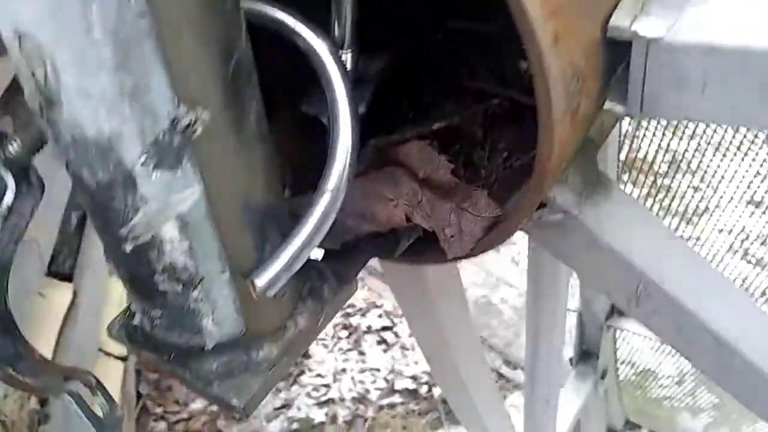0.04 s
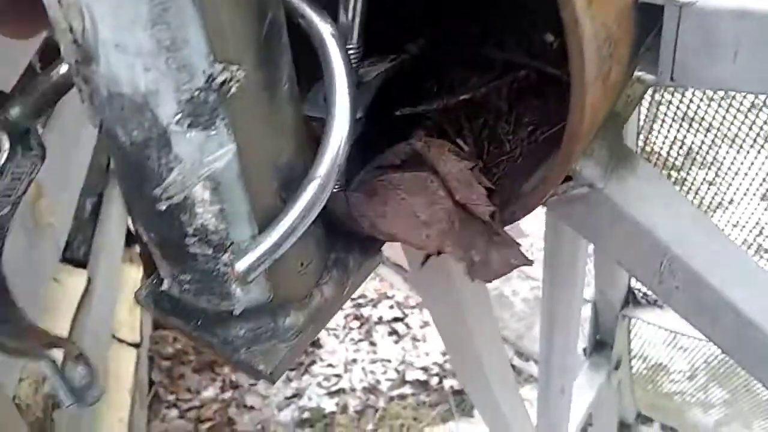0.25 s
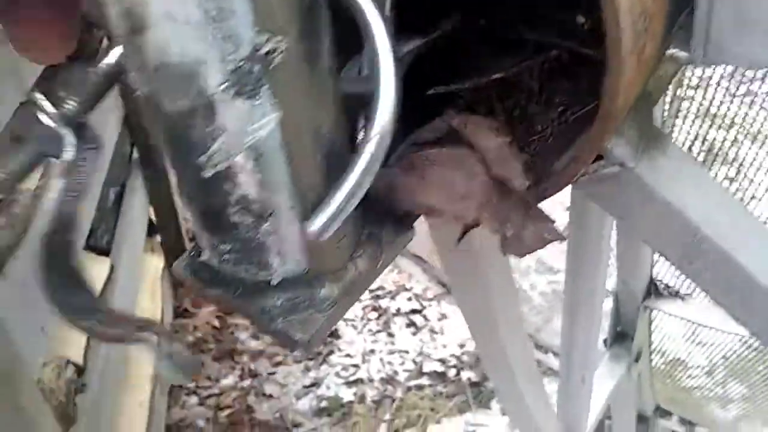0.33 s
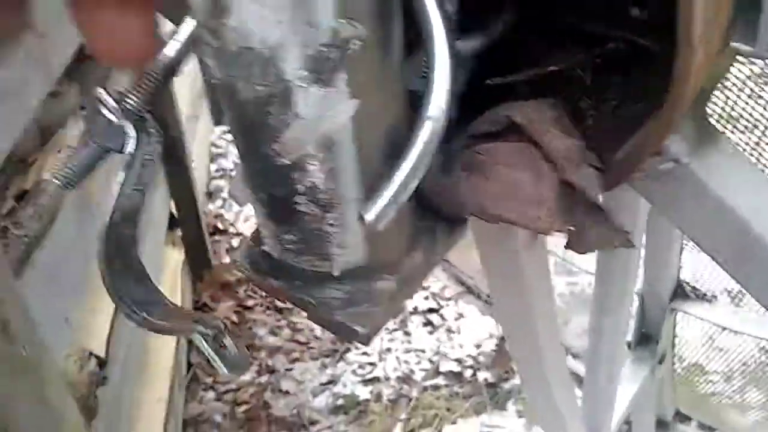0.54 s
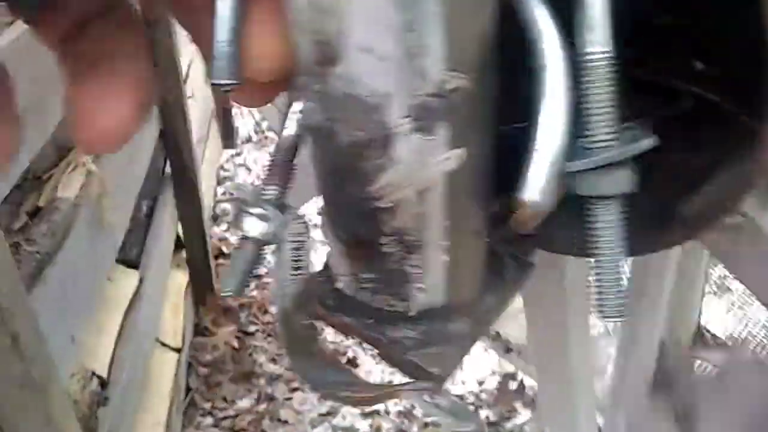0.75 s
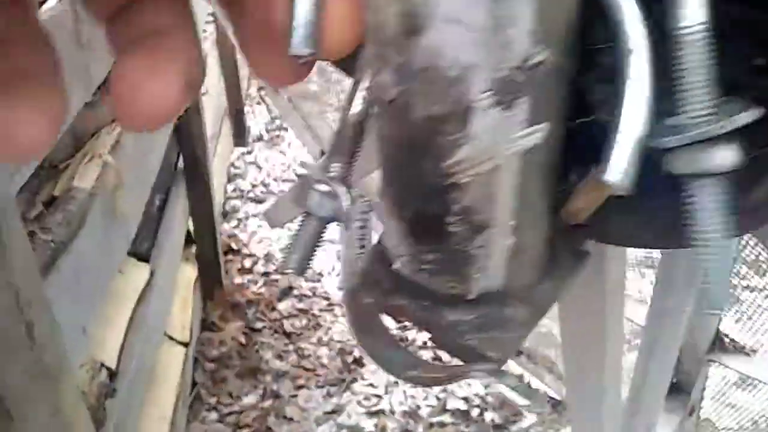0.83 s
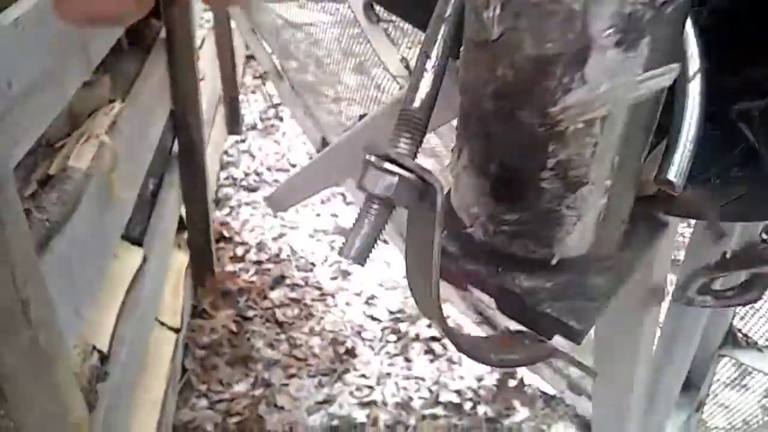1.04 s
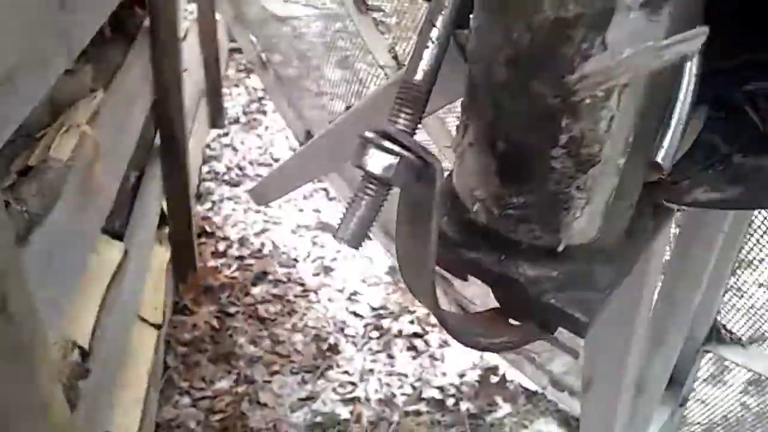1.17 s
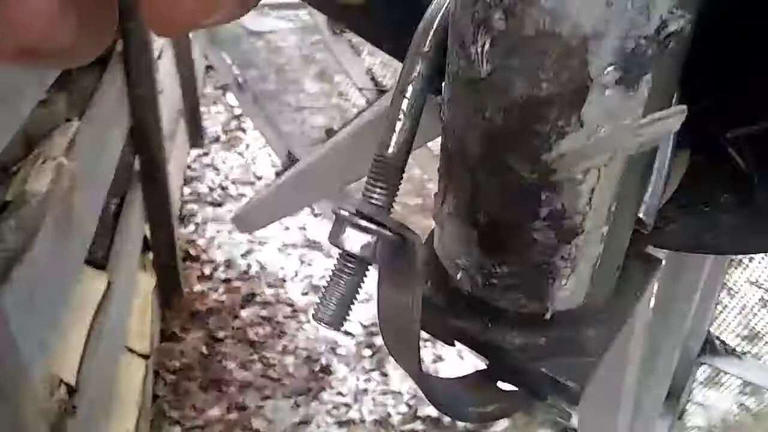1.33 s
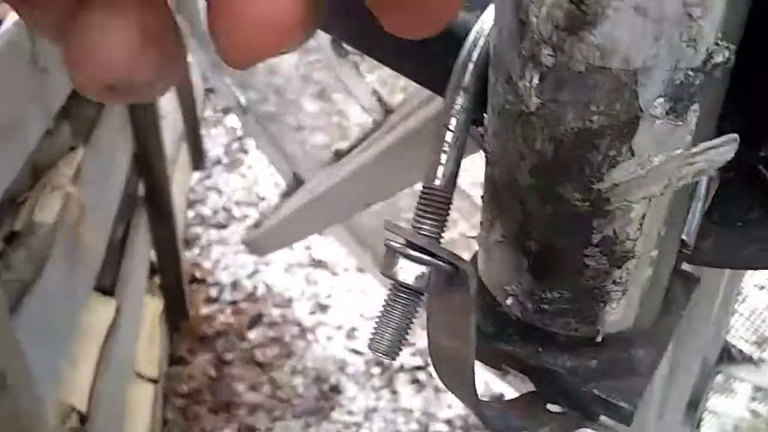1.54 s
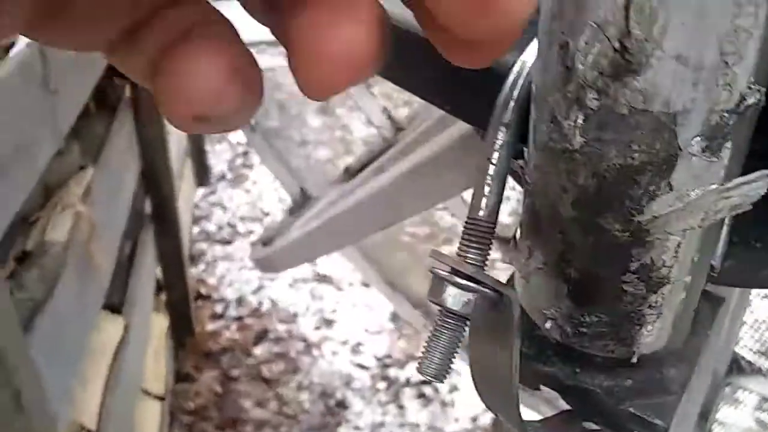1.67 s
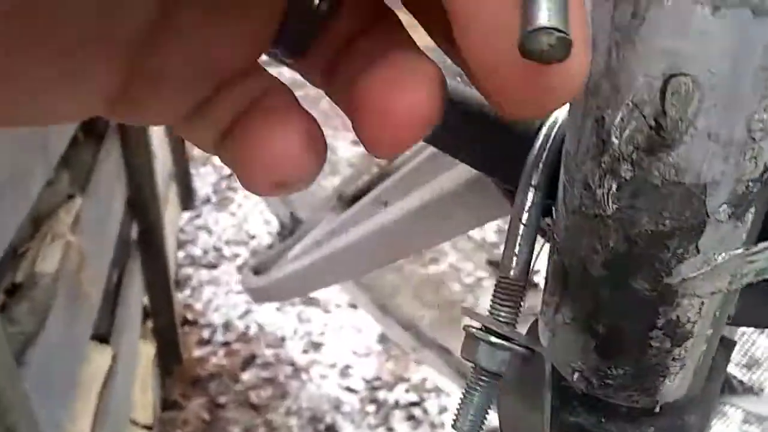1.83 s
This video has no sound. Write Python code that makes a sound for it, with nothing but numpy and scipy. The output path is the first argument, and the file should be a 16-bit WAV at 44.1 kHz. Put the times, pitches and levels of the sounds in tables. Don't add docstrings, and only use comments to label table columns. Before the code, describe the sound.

Loose steel bolts and a strap clink and rattle against a pipe, then settle into sparse ticks

```python
import sys
import numpy as np
from scipy import signal
from scipy.fft import rfft, irfft
from scipy.io import wavfile
from scipy.ndimage import uniform_filter1d

SR = 44100
rng = np.random.default_rng(int(sys.argv[2]) if len(sys.argv) > 2 else 0)


def volts(x):
    e = np.asarray(x, float) / 20
    return 10 ** e


def master(y):
    cut = np.clip(np.atleast_2d(y).T, -1, 1)
    pcm = np.round(cut * 32767)
    wavfile.write(sys.argv[1], SR, pcm.astype(np.int16))


N = 83790

# frequency in Hz, level in dB per Hz.
STEEL_SPECTRUM = [(150, -53), (250, -21.5), (2200, -6.5), (2440, -4), (4100, -2.5), (5310, -4), (9880, -4),
                  (13500, -14), (15500, -36)]
# frequency in Hz, left-right difference in dB.
CONTACT_LEAN = [(150, -21.5), (1200, 2), (2500, -7), (5000, 2), (7200, -9.5), (8600, -6), (10500, -7.5),
                (14000, -19)]
BOLT_MODES = [3900, 4400, 5340, 6500, 7400, 7830, 8820, 10040, 11450, 12400, 13200, 13600]
HANDLING_PAN_DB = -9.5
PORTS_ALIKE = 0.16


def at_hz(points, hz):
    points = np.array(points)
    return np.interp(np.log(hz + 1e-9), np.log(points[:, 0]), points[:, 1])


def sides(db):
    return volts(np.array([db / 2, -db / 2]))


def coloured(x, spectrum, lean):
    hz = np.fft.rfftfreq(N, 1 / SR)
    mean_lean = np.mean(np.array(lean)[:, 1])
    gain = volts(at_hz(spectrum, hz)) * sides(at_hz(lean, hz) - mean_lean)
    return irfft(rfft(x) * gain / np.sqrt(np.mean(gain ** 2)), N)


def pair(size, alike):
    a, b = rng.standard_normal((2, size))
    alike = np.clip(alike, 0, 1)
    return np.array([a, alike * np.roll(a, 9) + np.sqrt(1 - alike ** 2) * b])


def octave_part(x, low, high):
    return signal.sosfilt(signal.butter(2, [low, high], "band", fs=SR, output="sos"), x)


def high_pass(x, order, hz):
    return signal.sosfilt(signal.butter(order, hz, "high", fs=SR, output="sos"), x)


def smooth_noise(size, width):
    return uniform_filter1d(uniform_filter1d(rng.standard_normal(size), size=width), size=width)


def fade(t, t60):
    return volts(-60 * t / t60)


def add(out, s, sound):
    i = max(int(s * SR), 0)
    out[:, i:i + sound.shape[1]] += sound[:, :N - i]


def open_air():
    # frequency in Hz, level in dB per Hz.
    air_spectrum = [(25, -14), (65, -5), (130, -3), (220, -13.5), (900, -20), (3000, -21), (9000, -16.5),
                    (14500, -12.5)]
    air_lean = [(30, -1.5), (300, -4.5), (2000, -1), (12000, -9)]  # Hz, left-right dB
    level_db = -57.5 + 4.5 - 3.3 * np.arange(N) / SR
    return volts(level_db) * coloured(pair(N, 0.52), air_spectrum, air_lean)


def knocks():
    # start in seconds, level in dB, left-right difference in dB, centre in Hz, t60 in seconds.
    knock_rows = [(0, -34.5, 1, 1510, 0.9), (0, -49.5, 4.5, 378, 0.7), (.69, -44.5, 2, 5940, 0.27),
                  (0.61, -36.5, -19, 73.3, 0.13), (.938, -34, -5, 357.5, 0.11), (.939, -24, 0.5, 1416, 0.1),
                  (1.077, -24, 2, 1852, 0.08), (1.084, -37, 2.5, 674, 0.28), (1.139, -36, 2, 1500, 0.18),
                  (1.832, -31, 3, 1760, 0.021), (1.862, -48.5, 5, 1880, 0.028), ]
    out, t = np.zeros((2, N)), np.arange(12000) / SR
    for s, db, pan, hz, t60 in knock_rows:
        band = octave_part(pair(2 * len(t), PORTS_ALIKE), hz / 1.367, hz * 1.255)[:, len(t):]
        shape = fade(t, t60) * np.minimum(t * hz, 1)
        add(out, s, volts(db) * sides(pan)[:, None] * band / band.std() * shape)
    return out


def scrapes():
    # start in seconds, length in seconds, rms level in dB, place of the peak from 0 to 1.
    stroke_rows = [(0, .065, -42, 0), (0.058, 0.15, -28, 0.2), (0.167, 0.055, -31, 0.23),
                   (0.193, 0.036, -24, 0.63), (0.237, 0.088, -30, 0.32), (0.393, 0.076, -26.5, 0.17),
                   (0.434, 0.066, -23, 0.54), (0.516, 0.031, -34.5, 0), (0.547, 0.067, -19.5, 0.43),
                   (0.605, 0.034, -11, 0), (0.619, 0.057, -18.5, 0.47), (0.667, 0.068, -24.5, 0.6),
                   (0.923, 0.076, -19.5, 0.3), (0.969, 0.038, -18.5, 0.4), (0.995, 0.15, -31.5, 0),
                   (1.075, 0.017, -31, 0), (1.325, 0.037, -48.5, 0), (1.517, 0.055, -34.5, 0.1),
                   (1.559, 0.088, -51, 0.28), (1.709, 0.078, -46.5, 0.23)]
    grains_per_s, grain_spread_db, rasp_db = 8800, 2, 0
    mode_q, mode_share = 45, 1.2
    stroke = np.zeros((2, N))
    for s, length, db, peak in stroke_rows:
        pan = HANDLING_PAN_DB if s < .8 else -5
        u, peak = np.linspace(0, 1, int(length * SR)), np.clip(peak, .12, .9)
        swell = np.sin(np.pi / 2 * np.minimum(u / peak, (1 - u) / (1 - peak))) ** 3.2
        add(stroke, s, volts(db) * sides(pan)[:, None] * swell)
    rasp = smooth_noise(N, 70)
    sizes = volts(grain_spread_db * np.minimum(rng.exponential(1, N), 4))
    sizes = sizes * (rng.random(N) < grains_per_s / SR)
    sizes = uniform_filter1d(sizes, size=12) * volts(rasp_db * rasp / rasp.std())
    grit = stroke * pair(N, PORTS_ALIKE) * sizes / np.sqrt(np.mean(sizes ** 2))
    modes = sum(signal.lfilter(*signal.iirpeak(hz, mode_q, fs=SR), grit) for hz in BOLT_MODES)
    return coloured(grit + mode_share * modes, STEEL_SPECTRUM, CONTACT_LEAN)


def pipe(contact):
    # frequency in Hz, level in dB.
    hum_spectrum = [(200, -25), (300, -18), (600, -11.5), (1300, -12.5), (2200, -15), (4500, -19.5),
                    (14000, -38.5)]
    # frequency in Hz, t60 in seconds.
    hum_t60 = [(250, .12), (600, 0.34), (1400, 0.56), (3000, 0.12), (10000, 0.39)]
    t, answer = np.arange(20000) / SR, 0
    for hz in 200 * 2 ** np.arange(0, 6.5, .5):
        band = octave_part(rng.standard_normal((2, len(t))), hz / 1.19, hz * 1.19)
        shape = fade(t, at_hz(hum_t60, hz)) * np.minimum(t / 0.001, 1)
        answer = answer + volts(at_hz(hum_spectrum, hz)) * band * shape
    return volts(-19) * signal.fftconvolve(contact, answer, axes=1)[:, :N]


def rings():
    # start in seconds, frequency in Hz, level in dB, t60 in
    # seconds, held in seconds.
    strong_rings = [(.145, 9000, -39, 0.38, 0.088), (0.336, 6684, -4.5, 0.079, 0.019),
                    (.337, 9500, -22, 0.19, 0.052), (.337, 12190, -14.5, 0.076, .055),
                    (0.352, 7105, -18, 0.18, 0.031), (.689, 8092, -24, 0.42, .23),
                    (.689, 13570, -12.5, 0.071, .06), (.689, 4110, -27, .1, 0.055),
                    (.889, 9300, -38.5, 0.39, 0.038), (.92, 9330, -23, 0.32, 0.031),
                    (.938, 7240, -7.5, 0.21, 0.031), (0.939, 4126, -21, 0.33, .11),
                    (0.977, 3290, -23.5, 0.39, 0.054),
        (.97, 9418, -18.5, 0.36, 0.023),
        (0.995, 9450, -9.5, .14, 0.061),
        (1.017, 7100, -25.5, 0.29, 0.037),
        (1.147, 7240, -12.5, 0.025, 0.024),
        (1.15, 1272, -39, 0.61, 0.18),
        (1.312, 3760, -24.5, 0.027, .02),
        (1.311, 9430, -24.5, 0.088, 0.13),
        (1.39, 9500, -24.5, 0.022, 0.019),
        (1.593, 9420, -42.5, 0.077, 0.041),
    ]
    # start in seconds, level in dB, held in seconds.
    freeing_strikes = [
        (0, -45, 0.064),
        (.339, -33, .04),
        (.69, -44.5, .05),
        (.92, -29.5, 0.017),
        (.939, -23, 0.023),
        (1.016, -38.5, .06),
        (1.136, -43.5, .025),
    ]
    # frequency in Hz, left-right difference in dB.
    ring_lean = [(1300, 2.5), (3300, -9), (4100, 2), (7100, -3), (8100, -10), (9400, -10), (13000, -18.5)]
    mode_t60_s, mode_spread_db, waver_db = .08, 3, 2.2
    lesser = []
    for s, db, held in freeing_strikes:
        for hz in BOLT_MODES:
            start = s + 0.24 * held * rng.random() ** 2
            level = db + mode_spread_db * rng.normal()
            t60 = mode_t60_s * rng.uniform(0.13, 1.1)
            lesser.append((start, hz, level, t60, held * rng.uniform(.4, 1)))
    out, t = np.zeros((2, N)), np.arange(12000) / SR
    for s, hz, db, t60, held in strong_rings + lesser:
        phase = rng.random((2, 1))
        waver = smooth_noise(len(t), 180)
        touched = fade(np.maximum(t - held, 0), 0.0095)
        shape = fade(t, t60) * touched * np.minimum(t / 0.0017, 1)
        shape = shape * volts(waver_db * waver / waver.std())
        tone = np.sin(2 * np.pi * (hz * t + phase))
        add(out, s, volts(db) * sides(at_hz(ring_lean, hz))[:, None] * tone * shape)
    return out


def taps():
    # start in seconds, peak level in dB.
    handling_taps = [(0.179, -5), (0.1874, -18), (0.1995, -6.5), (0.2607, -9), (0.2769, -10),
                     (0.2942, -7.5), (0.3115, -2.5), (0.3375, 8), (0.392, 2.5), (0.413, -7), (0.4529, -6.5),
                     (0.4669, -6), (0.494, -22.5), (0.5159, 1), (0.5543, -2), (0.5646, -1), (0.585, -6),
                     (0.601, 10.5), (0.6449, -6.5), (0.6888, 2.5)]
    # start in seconds, peak level in dB, left-
    # right difference in dB.
    placed_taps = [(0.8889, -20, -0.5), (0.9387, 1.5, -1.5), (0.9748, -13.5, -4), (0.9834, -8.5, -8),
                   (0.9851, -8, -2.5), (1.1111, -19, 0), (1.1345, -14.5, -1), (1.1473, -20, -12),
                   (1.1682, -24.5, -10.5), (1.281, -29, -7), (1.3013, -24, -22), (1.3418, -26, -6.5),
                   (1.3892, -24, -14), (1.5226, -15.5, 8), (1.5267, -13.5, -15.5), (1.5396, -22, 13),
                   (1.5722, -29.5, -5), (1.5958, -28, -14), (1.693, -44, 2.5), (1.7055, -32.5, -12),
                   (1.7566, -28, -9),
                   (.6105, 1, -4),
        (1.3106, -9, -5),
        (1.3143, -12, -5),
        (.614, 0, -3),
    ]
    out, t = np.zeros((2, N)), np.arange(4000) / SR
    burst_t60_s, tail_t60_s, tail_db, rise_s = 0.0069, .04, -27, 0.00051
    shape = fade(t, burst_t60_s) + volts(tail_db) * fade(t, tail_t60_s)
    shape = np.minimum(t / rise_s, 1) * shape
    handled = [(s, db, HANDLING_PAN_DB) for s, db in handling_taps]
    for s, db, pan in handled + placed_taps:
        burst = pair(len(t), PORTS_ALIKE) * shape
        hz = 3500 * 2 ** rng.uniform(0, 1.6)
        burst = burst + 1.97 * signal.lfilter(*signal.iirpeak(hz, 6.0, fs=SR), burst)
        burst = burst / np.abs(burst).max(axis=1, keepdims=True)
        add(out, s, volts(db - 3.5) * sides(pan)[:, None] * burst)
    return coloured(out, STEEL_SPECTRUM, CONTACT_LEAN)


def scene():
    contact = taps() + scrapes()
    lifted = np.arange(N) > 1.25 * SR
    contact = np.where(lifted, high_pass(contact, 2, 3300), contact)
    hum = pipe(np.where(lifted, .3, 1) * contact)
    return contact + hum + knocks() + rings() + open_air()


def band_limit(x):
    return signal.sosfilt(signal.butter(12, 15630, fs=SR, output="sos"), x)


def record(dry):
    x = signal.sosfilt(signal.cheby2(10, 30, 14800, fs=SR, output="sos"), dry)
    ceiling = 1.1
    rounding = ceiling * np.tanh(x / ceiling) - x
    x = x + high_pass(rounding, 4, 400)
    return band_limit(np.clip(x, -1, 1))


dry = scene()
out = record(dry)
master(out)
```